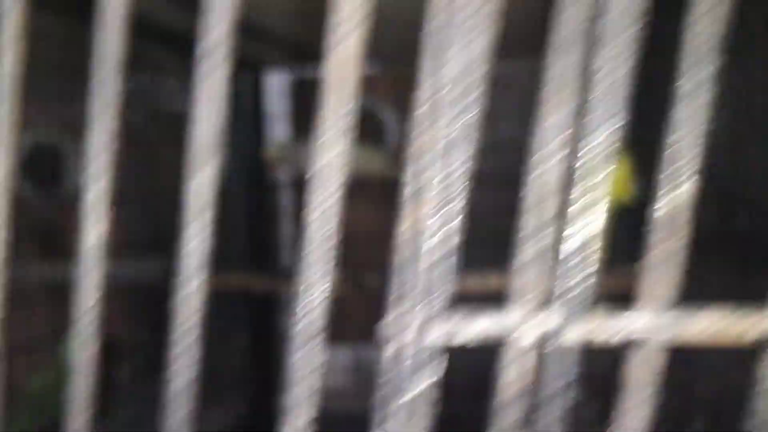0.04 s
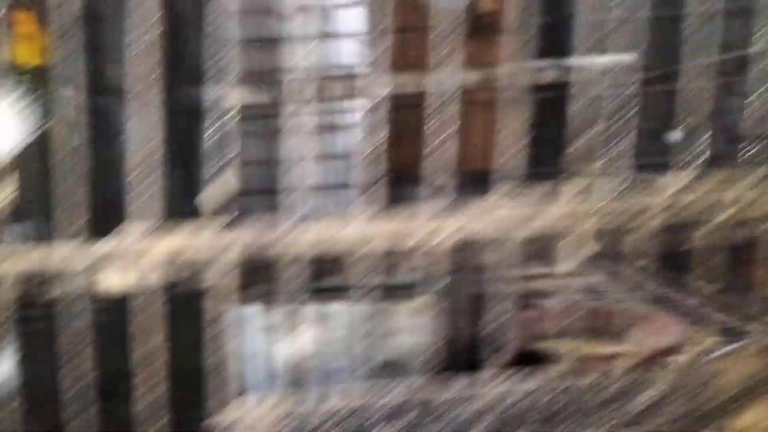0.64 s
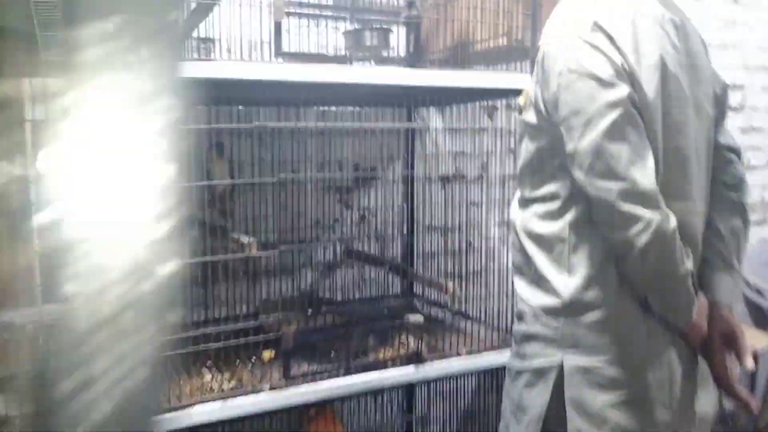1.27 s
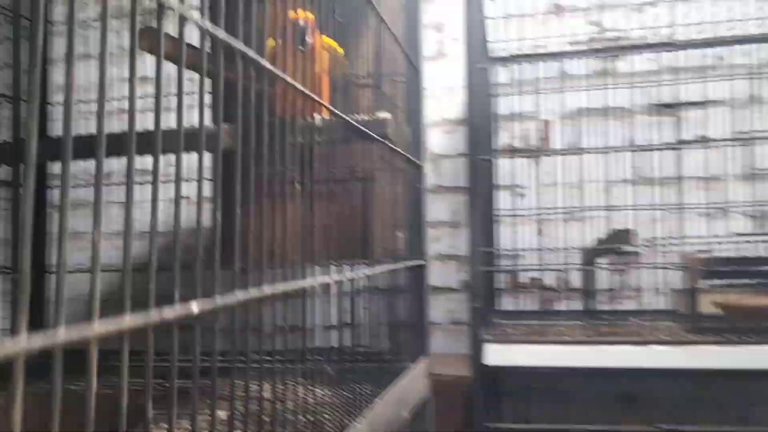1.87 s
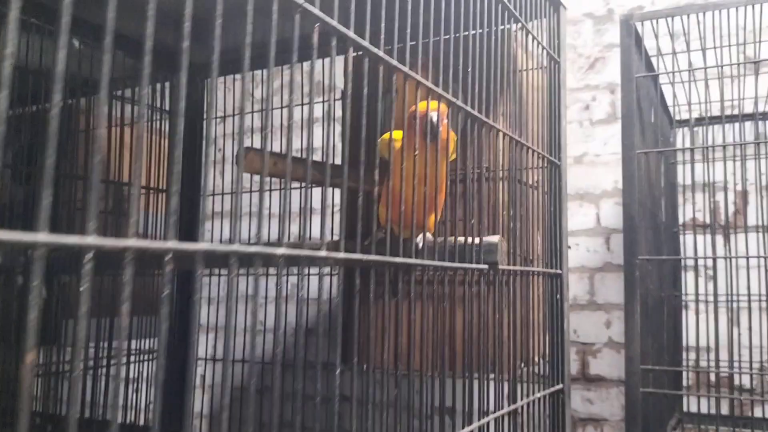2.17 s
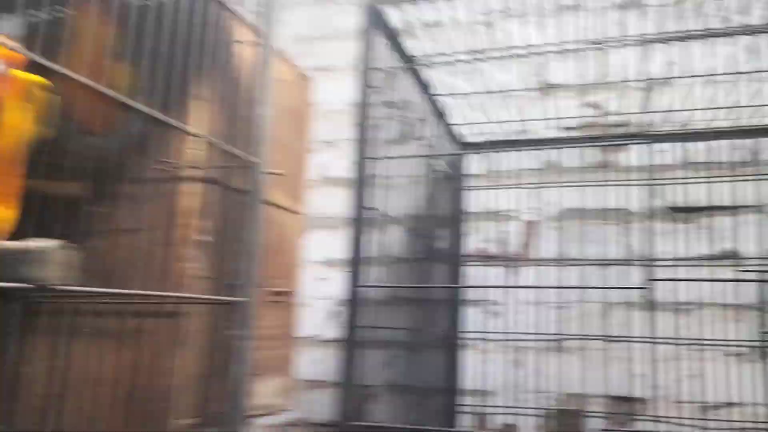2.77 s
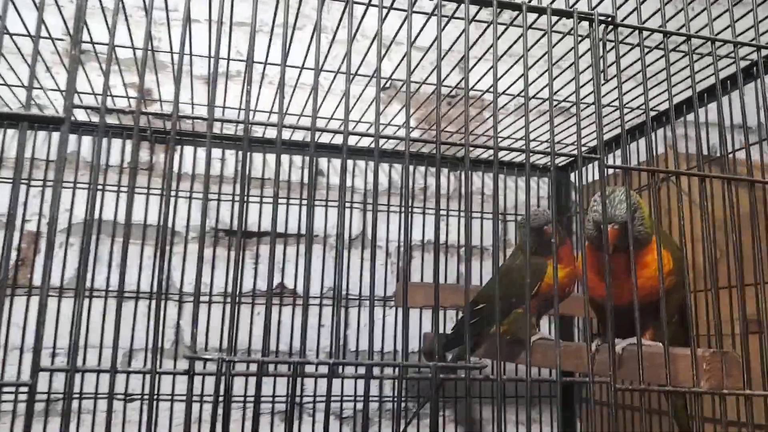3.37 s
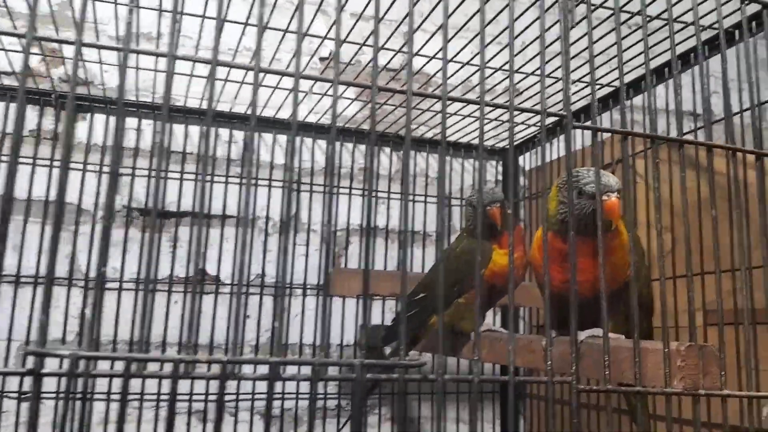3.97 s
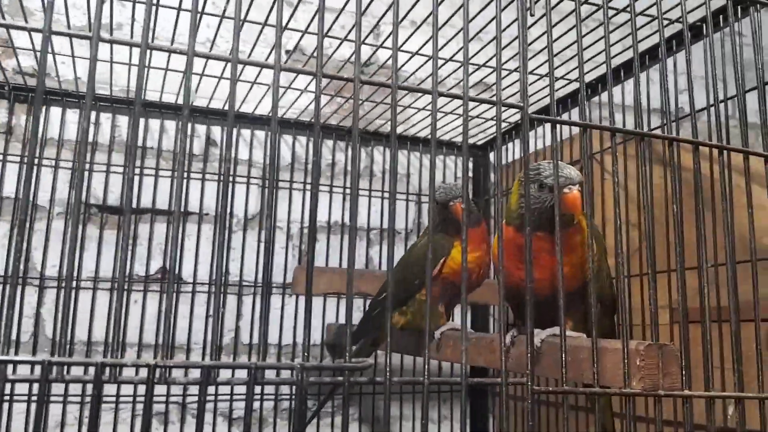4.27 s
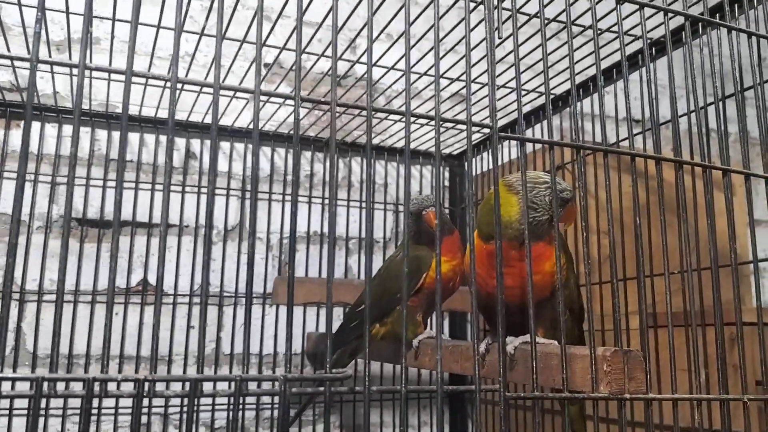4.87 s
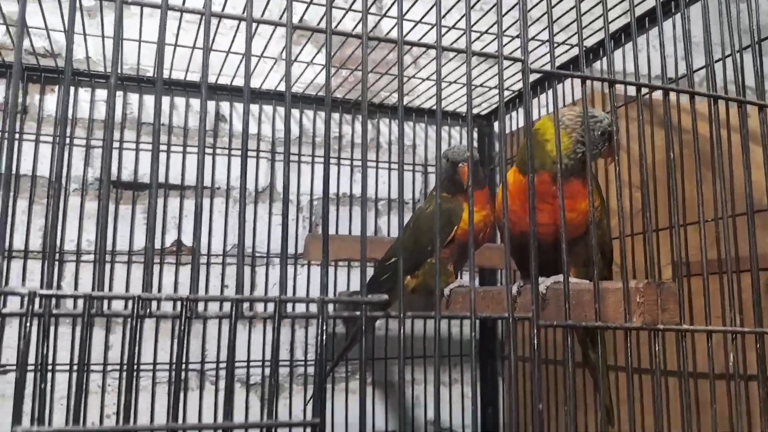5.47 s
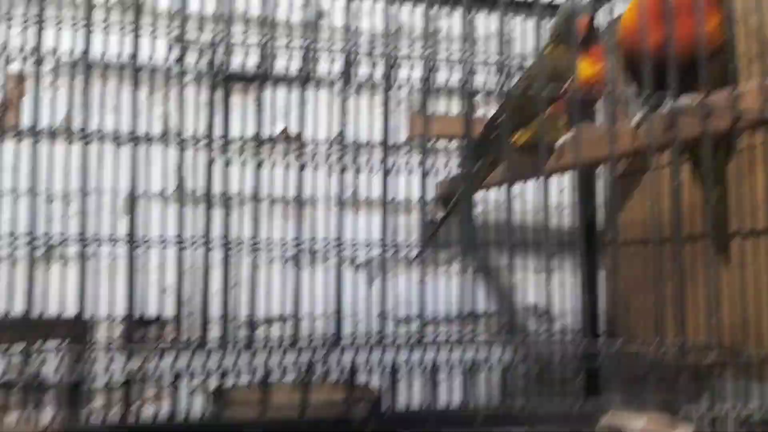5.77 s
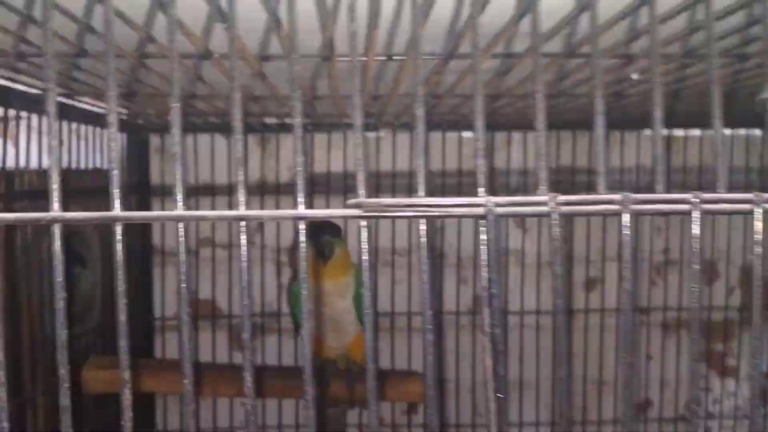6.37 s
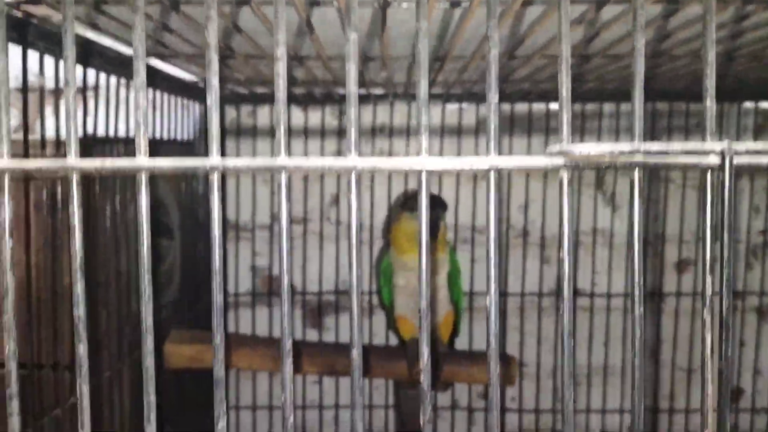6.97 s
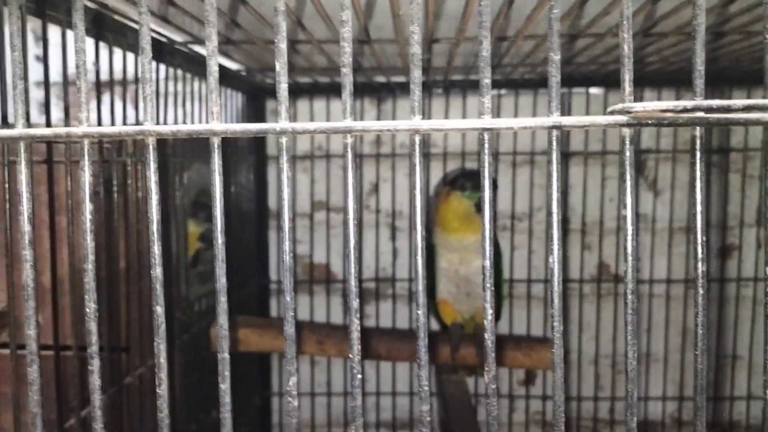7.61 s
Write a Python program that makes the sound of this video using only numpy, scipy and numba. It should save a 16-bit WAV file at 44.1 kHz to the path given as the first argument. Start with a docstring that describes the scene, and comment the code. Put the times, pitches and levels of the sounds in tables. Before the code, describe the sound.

Caged parrots squawk, screech and whistle in shrill clusters close by, over rushing room noise and distant bird chatter in a small room.

```python
"""In a small brick room, parrots squawk and screech in wire cages, close to a hand-held phone.
A squawk is a rattling train of short chirps that starts as a low rasp and breaks upward into a screech.
That bird also croaks, and another gives arched whistles; both voices come from a vibrating membrane.
Behind them are room noise, far birds, one cage rattle and soft bumps of the hand. The walls ring
briefly, and the phone's gain control ducks the room noise under each call and lets it creep back."""
import sys
import numpy as np
from scipy import signal
from scipy.fft import rfft, irfft, next_fast_len
from scipy.io import wavfile
from scipy.ndimage import uniform_filter1d, minimum_filter1d
from numba import njit

SR = 44100
rng = np.random.default_rng(int(sys.argv[2]) if len(sys.argv) > 2 else 0)


def bounce(signal):
    """Save signal as a 16-bit WAV file at the path given by the first command-line argument."""
    frames = np.transpose(np.atleast_2d(signal))
    limited = np.clip(frames, -1, 1)
    pcm = np.round(limited * 32767).astype(np.int16)
    wavfile.write(sys.argv[1], SR, pcm)


N = 341334
T = np.arange(N) / SR


def undb(db):
    """Turn decibels into a number to multiply by."""
    return 10 ** (np.asarray(db) / 20)


def unit(x):
    """Scale a sound to an average (rms) strength of 1."""
    return x / np.sqrt(np.mean(x ** 2) + 1e-18)


def along(points, hz):
    """Read between (frequency [Hz], value) points, with octaves evenly spaced."""
    f, value = np.transpose(points)
    return np.interp(np.log(np.maximum(hz, 1)), np.log(f), value)


def colour(x, points):
    """Turn parts of a sound up or down by (frequency [Hz], gain [dB]) points."""
    size = next_fast_len(len(x) + 1024)
    gain = undb(along(points, np.fft.rfftfreq(size, 1 / SR)))
    return irfft(rfft(x, size) * gain, size)[:len(x)]


def wander(t, rate, count=4096):
    """A random wobble: rate values a second, joined by lines."""
    return np.interp(t * rate % count, np.arange(count), rng.standard_normal(count))


def sine(hz):
    """A pure tone that follows a changing pitch."""
    return np.sin(2 * np.pi * np.cumsum(hz) / SR)


def add(out, start, x):
    """Mix x into out from a start time."""
    i = max(int(start * SR), 0)
    out[i:i + len(x)] += x[:max(len(out) - i, 0)]


# Tone of the room noise at the first cages and further in: (frequency [Hz], gain [dB])
FIRST_AIR_COLOUR = [(24, -50), (40, -11), (93, -7), (202, -1.5), (247, 0), (461, -6), (522, -4), (637, -12),
                    (758, -3.5), (1350, -12.5), (1960, -3), (5300, -10.5), (6980, -12.5), (9650, -30.5),
                    (15500, -19.5)]
INNER_AIR_COLOUR = [(24, -63), (40, -25), (247, -4.5), (496, -10.5), (606, -18), (949, -9), (1280, -17),
                    (1960, -5), (3740, -6), (4570, -14), (6010, -8), (7910, -19), (9650, -35.5),
                    (11800, -26.5), (15500, -31)]
def air(first_db=-37, inner_db=-33.5):
    """Steady rushing room noise, changing colour as the phone is carried in."""
    inside = np.interp(T, [1.0, 2.2], [0, 1])
    first = unit(colour(rng.standard_normal(N), FIRST_AIR_COLOUR)) * undb(first_db)
    inner = unit(colour(rng.standard_normal(N), INNER_AIR_COLOUR)) * undb(inner_db)
    return (np.sqrt(1 - inside) * first + np.sqrt(inside) * inner) * undb(0.96 * wander(T, 11.0))


# How loud the other cages are: (time [s], level [dB])
CHATTER_LEVELS = [(0, -42.5), (1.0, -39), (2.4, -33), (4.0, -37), (4.7, -33), (5.2, -33.5), (7.7, -39)]
# Tone of their chatter: (frequency [Hz], gain [dB])
CHATTER_TONE = [(450, -13), (700, -11), (1000, -9.5), (1400, -6.5), (1950, -1.5), (2600, 0.5), (3800, -14)]
def chatter(count=1700):
    """Many far birds: short, hoarse gliding notes at random times and pitches merge into a wash."""
    out = np.zeros(N)
    for when, pitch, span, glide, size in rng.uniform(size=(count, 5)):
        t = T[:int((.04 + .08 * span) * SR)]
        waver = 1 + 2 * (glide - .5) * t + .045 * wander(t, 300, count=64)
        hz = 450 * 2 ** (3 * pitch ** .8) * waver
        add(out, when * T[-1], (1 + size) * np.hanning(len(t)) * sine(hz))
    return unit(colour(out, CHATTER_TONE)) * undb(np.interp(T, *np.transpose(CHATTER_LEVELS)))


# Tone of the clattering wires: (frequency [Hz], gain [dB])
WIRE_COLOUR = [(59, -64), (100, -33), (192, -5), (270, -18), (727, -14.5), (917, -9.5), (1920, -18.5),
               (2130, -12.5), (3390, -17.5), (7250, -12), (9150, -28.5), (11800, -19.5), (15500, -33)]
# Notes the cage frame rings at: (pitch [Hz], relative level [dB], time to fade by 60 dB [s])
FRAME_NOTES = [(199.6, -44.5, 1), (934, -34, 0.57), (1020, -41, .2)]
def cage(clatter_db=-23, hold_s=0.045, fade_s=0.027):
    """A brief clatter of wires at the very start leaves the frame ringing."""
    t = T[:SR]
    wires = unit(colour(rng.standard_normal(len(t)) * undb(2.2 * wander(t, 398)), WIRE_COLOUR))
    clatter = undb(clatter_db) * wires * np.exp(-np.maximum(t - hold_s, 0) / fade_s)
    ring = sum(undb(db - 60 * t / t60) * np.sin(2 * np.pi * hz * t) for hz, db, t60 in FRAME_NOTES)
    return np.pad(clatter + 2 * ring, (0, N - len(t)))


# Faint calls: (start [s], length [s], first pitch [Hz], last pitch [Hz], level [dB])
FAR_WHISTLES = [(.04, 0.085, 805, 771, -29.5), (.17, 0.16, 830, 783, -43), (.28, 0.17, 790, 746, -41.5),
                (.49, 0.11, 1944, 1952, -34), (.52, 0.053, 529, 542, -37.5), (.64, 0.1, 778, 778, -42.5)]
def far_birds():
    """Thin, nearly pure whistles from far cages."""
    out = np.zeros(N)
    for start, length, first_hz, last_hz, db in FAR_WHISTLES:
        t = T[:int(length * SR)]
        hz = np.linspace(first_hz, last_hz, len(t)) * (1 + 0.0041 * wander(t, 100))
        add(out, start, undb(db) * signal.windows.tukey(len(t), .5) * sine(hz))
    return out


# Soft bumps of the hand on the phone: (start [s], length [s], relative level [dB])
HAND_BUMPS = [(0.264, 0.28, -47.5), (0.743, 0.17, -50), (2.533, 0.13, -44), (2.93, 0.21, -47),
              (3.35, 0.34, -47), (3.689, .15, -44), (4.783, 0.24, -45), (5.225, 0.23, -38.5),
              (5.699, 0.49, -47.5), (7.114, 0.16, -41), (7.533, 0.2, -37.5)]
def handling(body_hz=95, rub_db=-17.0):
    """At each bump the phone's body hums softly and the fingers give a dull rub."""
    out = np.zeros(N)
    rub = unit(colour(rng.standard_normal(N), [(40, -20), (150, 7), (260, -2), (700, -11), (2000, -52)]))
    for start, length, db in HAND_BUMPS:
        t = T[:int(length * SR)]
        hum = sine(body_hz * (1 + 0.016 * wander(t, 28)))
        touch = hum + undb(rub_db) * np.roll(rub, -int(start * SR))[:len(t)]
        add(out, start, undb(db) * 2 * np.hanning(len(t)) * touch)
    return out


def voice_box(hz, half, slope_db, shake, count=10):
    """A membrane's harmonics (multiples of its pitch) each shake in strength; slope_db is per octave."""
    t = T[:len(hz)]
    phase = 2 * np.pi * np.cumsum(hz) / SR
    tone = 0
    for k in range(1, count + 1):
        whole = (1 + shake * wander(t, 420)) * np.sin(k * phase)
        between = half * np.sin((k + .5) * phase)  # every other cycle differs, adding in-between tones
        tone = tone + undb(slope_db * np.log2(k)) * (whole + between) * ((k + .5) * hz < SR / 2)
    return unit(tone)


RASP_DUTY, SCREECH_DUTY = 0.52, 0.67  # share of each rattle cycle that sounds
LEAK, RELEASE_S = .034, .007  # voice left between chirps; how quickly a rattling call stops
def rattle(t, rate_hz, length, rough, duty, leak):
    """A flutter chops a call into upward chirps: returns loudness (gate) and pitch (chirp) factors."""
    cycle = np.cumsum(rate_hz * (1 + 0.024 * wander(t, 70))) / SR % 1
    pulses = (1 - np.exp(-cycle / 0.0072)) * np.exp(-(cycle / duty) ** 4) / np.sqrt(duty)
    outline = (1 - np.exp(-t / 0.00029)) / (1 + np.exp((t - length) / RELEASE_S))
    gate = unit(leak + pulses) * outline * undb(1.35 * wander(t, 73.6))
    sweep = 0.0299 + 0.2492 * rough
    chirp = 1 + sweep * (np.minimum(cycle, .6) - .29) + .012 * wander(t, 70)
    return gate, chirp


# Tone of a half-closed throat and beak: (frequency [Hz], gain [dB])
HALF_CLOSED_THROAT = [(600, -35), (1300, -14.5), (1900, -10.5), (2600, 1.5), (3500, 6.5), (4400, 3.5),
                      (5100, 6), (6200, -6.5), (7500, -6), (9200, -33.5), (12000, -21.5), (15000, -32)]
def rasp(t, hz, gate, pressure, db, swell_s, rough, rise=.2, swell_db=12.5):
    """The low voice: it swells, pressure pushes it up in pitch, and a soft rasp is also duller."""
    hz = hz * (1 + rise * pressure ** 3) * (1 + .03 * rough * wander(t, 802.3))
    tone = voice_box(hz, half=0.29 + .85 * pressure ** 3, slope_db=-0.5 + 0.28 * db, shake=0.91)
    breath = .2 * rough * rng.standard_normal(SR)[:len(t)]
    voice = colour((tone + breath) * gate, HALF_CLOSED_THROAT)
    return unit(voice) * undb(db - swell_db * np.exp(-t / swell_s))


# Tone of a wide-open throat and beak: (frequency [Hz], gain [dB])
OPEN_THROAT = [(600, -18), (1500, -51), (2150, -14), (2700, -8.5), (3200, -1.5), (4100, 0), (4900, 1),
               (5900, -4), (6650, -7), (7300, 0.5), (8100, -22.5), (9000, -24), (12000, -35), (15000, -31)]
def screech(t, hz, gate, held, db, rough, clear, hoarse, scoop=.055, sag=0.0396):
    """The high voice: it scoops up and sags at the end; its in-between tones grow as it is held."""
    arch = 1 - scoop * np.exp(-held / 0.1216) - sag * held ** 2
    hz = hz * arch * (1 + .03 * rough * wander(t, 698.4))
    half = 0.26 * clear + (.14 + .15 * hoarse) * (1 - clear)
    slope_db = -2 - clear  # a clear screech is rounder
    tone = voice_box(hz, half * (0.59 + 1.7 * held), slope_db, shake=0.26 + 1.47 * rough)
    breath = .11 * rough * rng.standard_normal(SR)[:len(t)]
    return unit(colour((tone + breath) * gate, OPEN_THROAT)) * undb(db)


# The nearest parrot's squawks: (start [s], length [s], wait for the upward break [s], rasp pitch [Hz],
# screech pitch [Hz], rasp level [dB], screech level [dB], roughness [0-1])
SQUAWK_CALLS = [ (1.035, 0.24, .11, 1361, 2064, -6.5, 0, 0.58),
                (1.371, 0.16, 0.036, 1383, 2057, -3.5, 1.5, 0.47),
                (1.535, .21, 0.046, 1900, 2151, -6.5, 1, 0.19),
                (1.763, .2, 0.023, 1483, 2060, -0.5, 0.5, 0.31),
                (1.968, 0.14, 0.041, 2000, 2073, -3.5, -1.5, 0.14),
                (3.242, 0.13, 0.1, 1415, 2104, -6.5, 3, 0.67), (3.483, .12, .078, 1520, 2108, -5, -1.5, .7),
                (3.638, .13, 0.092, 1428, 2050, -5.5, -3, .62),
                (5.527, 0.14, 0.11, 1541, 2050, -6.5, -0.5, 0.67),
                (5.767, .138, 0.035, 1298, 2144, -6.5, 1, 0.05),
                (5.935, 0.11, 0.07, 1397, 2057, -3, 2, .56),
                (6.287, 0.16, 0.036, 1277, 2051, -9.5, 0, 0.41),
                (6.512, 0.12, 0.037, 1348, 2064, -1.5, 2.5, 0.44),
                (6.728, .2, .047, 1277, 2034, -8.5, 3, 0.38), (7.168, .18, 0.019, 1393, 2050, 2, 0, 0.38),
                (7.631, 0.13, 0.0302, 1283, 1980, -8, 4, 0.42)]
def squawks(rattle_hz=76.94, hoarse_rattle_hz=155.13):
    """A low rasp swells, then the voice jumps to a screech; a later break is more gradual."""
    out = np.zeros(N)
    for start, length, turn, low_hz, high_hz, low_db, high_db, rough in SQUAWK_CALLS:
        t = T[:int((length + 4 * RELEASE_S) * SR)]
        opened = .5 + .5 * np.tanh(2 * (t - turn) / (0.448 * turn))  # 0 in the rasp, 1 in the screech
        clear = np.exp(-(rough / .15) ** 2)
        hoarse = np.clip((rough - .45) / .22, 0, 1)
        hoarse_rasp = hoarse * (1 - opened)
        rate_hz = rattle_hz * (1 - hoarse_rasp) + hoarse_rattle_hz * hoarse_rasp
        duty = RASP_DUTY * (1 - opened) + SCREECH_DUTY * opened
        # a clear screech or a hoarse rasp hardly breaks off between chirps
        leak = LEAK + 0.2 * clear * opened + 0.46 * hoarse_rasp
        gate, chirp = rattle(t, rate_hz, length, rough, duty, leak)
        pressure = np.minimum(t / turn, 1)
        held = np.clip((t - turn) / length, 0, 1)
        low = rasp(t, low_hz * chirp, gate, pressure, low_db, swell_s=0.43 * turn, rough=rough)
        high = screech(t, high_hz * chirp, gate, held, high_db, rough, clear, hoarse)
        add(out, start, low * np.sqrt(1 - opened) + high * opened)
    return out


# A second parrot's whistles: (start [s], length [s], time to the top of the arch [s],
# length of the crack [s], roughness the crack adds [0-1], level [dB])
WHISTLE_CALLS = [(2.652, 0.21, 0.11, 0.026, 0.73, -3.5), (4.797, 0.21, 0.11, .026, 0.31, -0.5),
                 (7.072, 0.18, .125, 0.032, .55, .5)]
# Tone of its throat and beak: (frequency [Hz], gain [dB])
WHISTLE_COLOUR = [(1200, 10), (2400, 10.5), (3100, 9), (4300, 4.5), (5500, 9), (6400, 2), (7500, -10),
                  (9000, -16), (10000, -25.5), (12000, -24), (15000, -30)]
def whistles(hold_hz=3018, top_hz=3293, end_hz=2650, scoop_hz=336, crack_drop_hz=499.5):
    """Each whistle scoops up, cracks into a lower, weaker rasp, arches over a purer top and sinks."""
    rise_s, fall_s, attack_s, release_s = 0.0283, .04, .022, 0.073
    crack_at_s, edge_s = .024, 0.0041
    out = np.zeros(N)
    for start, length, top, crack_s, crack_rough, db in WHISTLE_CALLS:
        t = T[:int(length * SR)]
        rising = t < top
        arch = np.exp(-((t - top) / np.where(rising, rise_s, fall_s)) ** 2)
        since_crack = t - crack_at_s
        crack = .5 * (np.tanh(since_crack / edge_s) - np.tanh((since_crack - crack_s) / (2 * edge_s)))
        rough = 0.073 * arch + 0.21 * (1 - arch) + crack_rough * crack
        hz = top_hz * arch + np.where(rising, hold_hz, end_hz) * (1 - arch)
        hz -= scoop_hz * np.exp(-t / 0.0095) + crack_drop_hz * crack
        hz *= 1 + 0.0141 * wander(t, 80.3)  # unsteady pitch
        hz *= 1 + .011 * wander(t, 330) + .075 * rough * wander(t, 900)  # faster quaver
        tone = voice_box(hz, half=1.5 * rough ** 2, slope_db=2.5, shake=0.52, count=5)
        breath = 0.058 * rough * rng.standard_normal(SR)[:len(t)]
        voice = unit(colour(tone + breath, WHISTLE_COLOUR))
        faded = np.maximum(1 - t / attack_s, 0) + np.maximum(1 - (length - t) / release_s, 0) ** 2
        level_db = db - 20 * faded - 45 * np.maximum(top - t, 0) - 5 * crack  # swells toward the top
        add(out, start, voice * undb(level_db) * signal.windows.tukey(len(t), .05))
    return out


# The nearest parrot's low croaks: (start [s], length [s], pitch [Hz], level [dB])
CROAK_CALLS = [(3.099, 0.1, 1292, -11.5), (5.284, 0.098, 1198, -14.5), (5.458, 0.012, 1180, -16.5)]
def croaks(rattle_hz=70, rough=0.7, pressure=.3, swell_s=0.0071):
    """The rasp alone, rattling at a low, steady pressure and never breaking upward."""
    out = np.zeros(N)
    for start, length, hz, db in CROAK_CALLS:
        t = T[:int((length + 4 * RELEASE_S) * SR)]
        gate, chirp = rattle(t, rattle_hz, length, rough, RASP_DUTY, LEAK)
        add(out, start, rasp(t, hz * chirp, gate, pressure, db, swell_s, rough))
    return out


# How long the brick walls ring: (frequency [Hz], time to fade by 60 dB [s])
WALL_RING_TIMES = [(300, 0.38), (2500, 0.25), (4200, 0.26), (8000, 0.18), (15000, 0.32)]
def room(x, tail_db, slap_db, slaps=24):
    """Direct sound, slaps from the near walls that change as the phone moves, and a short tail."""
    t = T[:int(.7 * SR)]
    out = np.zeros(N)
    for second in np.arange(np.ceil(T[-1]) + 1):  # a new place in the room each second
        hz, age, noise = signal.stft(rng.standard_normal(len(t)), SR)
        decay = undb(-60 * age / along(WALL_RING_TIMES, hz)[:, None])
        tail = signal.istft(noise * decay, SR)[1][:len(t)] * (1 - np.exp(-t / 0.018))
        echo = undb(tail_db) * tail / np.linalg.norm(tail)
        echo[0] += 1  # the direct sound
        delays = rng.uniform(.002, .028, slaps)
        for delay, size in zip(delays, rng.standard_normal(slaps)):
            echo[int(delay * SR)] += undb(slap_db) * size / np.sqrt(slaps)
        near = np.abs(T - second) < .55
        if near.any():
            share = np.clip((.55 - np.abs(T[near] - second)) * 10, 0, 1)  # blends into the next place
            add(out, T[near][0], signal.fftconvolve(x[near] * share, echo / np.linalg.norm(echo)))
    return out


def scene():
    """Birds and cage in the room, over its noise and the hand on the phone."""
    near = room(squawks() + croaks(), tail_db=-3.0, slap_db=1.5)
    further = room(whistles() + far_birds() + chatter(), tail_db=-2.5, slap_db=-2.5)
    return (near + further + cage() + air() + handling())[None]


@njit
def follow(level, attack, release):
    """Track loudness, rising fast and falling slowly."""
    out, tracked = np.empty(len(level)), 0.
    for i in range(len(level)):
        tracked += (level[i] - tracked) * (attack if level[i] > tracked else release)
        out[i] = tracked
    return out


# How the microphone dulls the treble: (frequency [Hz], gain [dB])
MICROPHONE_COLOUR = [(8000, 1), (9400, -9), (11000, -5.5)]
def record(dry, overload=3.57, limit_db=-7.5, attack_s=0.00023, release_s=0.62, ceiling=.8, top_hz=15600):
    """The microphone distorts loud screeches, gain control evens out the calls, and the top is cut."""
    bent = overload * np.tanh(dry[0] / overload)
    heard = colour(bent + 0.0021 * bent ** 2, MICROPHONE_COLOUR)  # the bend is slightly lopsided
    heard = signal.sosfilt(signal.butter(2, 55, "high", fs=SR, output="sos"), heard)
    level = np.sqrt(np.abs(uniform_filter1d(heard ** 2, size=64)))
    envelope = follow(level, 1 / (attack_s * SR), 1 / (release_s * SR))
    held = heard / np.maximum(envelope / undb(limit_db), 1)
    # a fast limiter catches what the gain control lets through
    safe_gain = ceiling / np.maximum(np.abs(held), ceiling)
    limited = held * uniform_filter1d(minimum_filter1d(safe_gain, size=65), size=65)
    return signal.sosfilt(signal.ellip(10, .2, 90, top_hz, fs=SR, output="sos"), limited)[None]


dry = scene()
out = record(dry)
bounce(out)
```